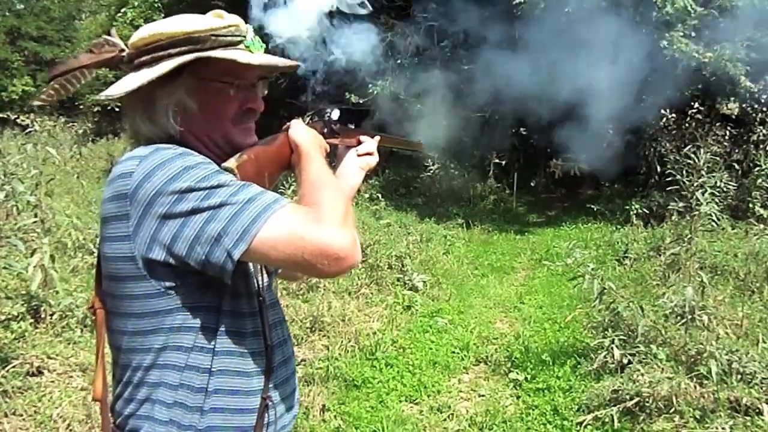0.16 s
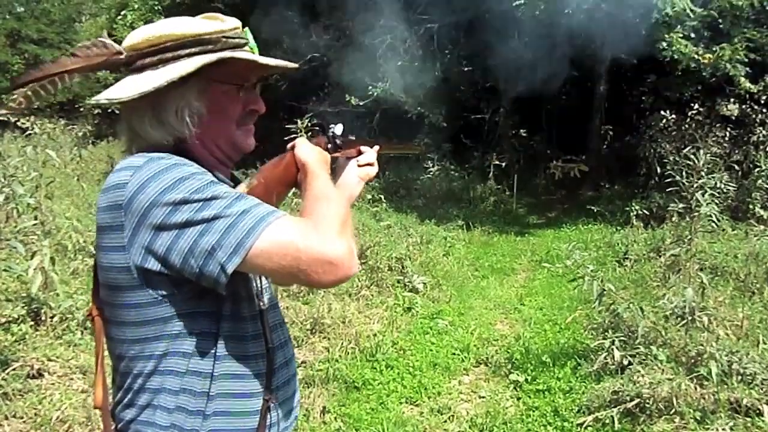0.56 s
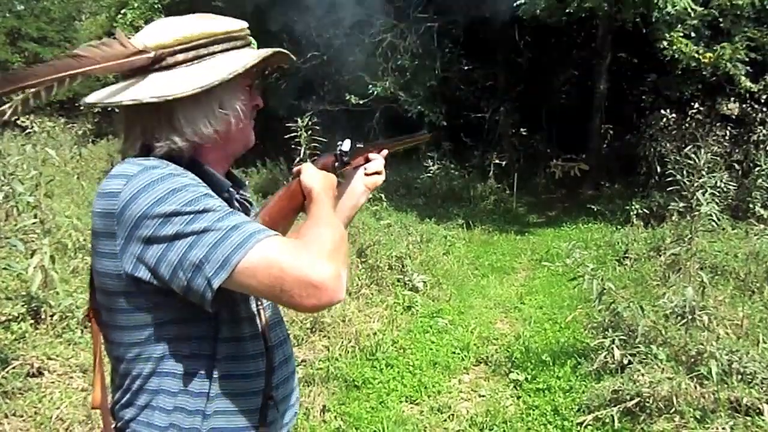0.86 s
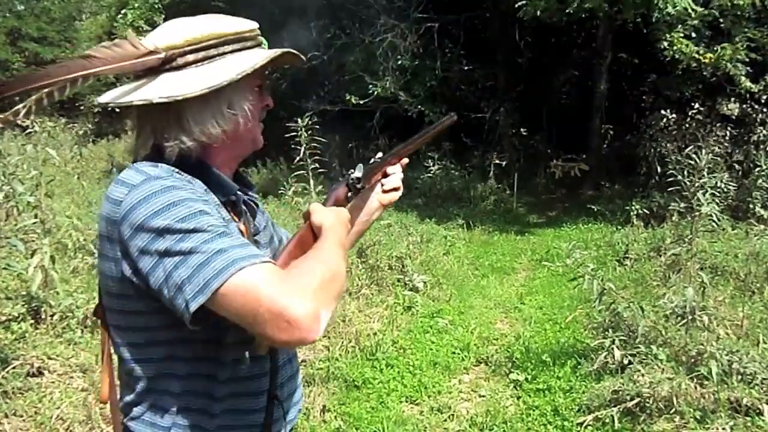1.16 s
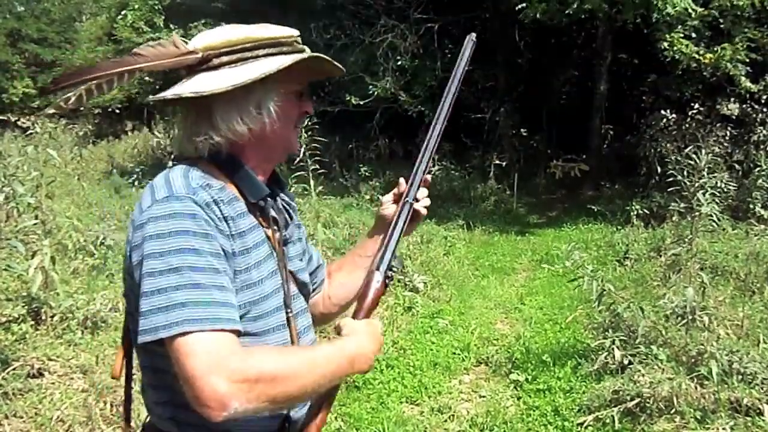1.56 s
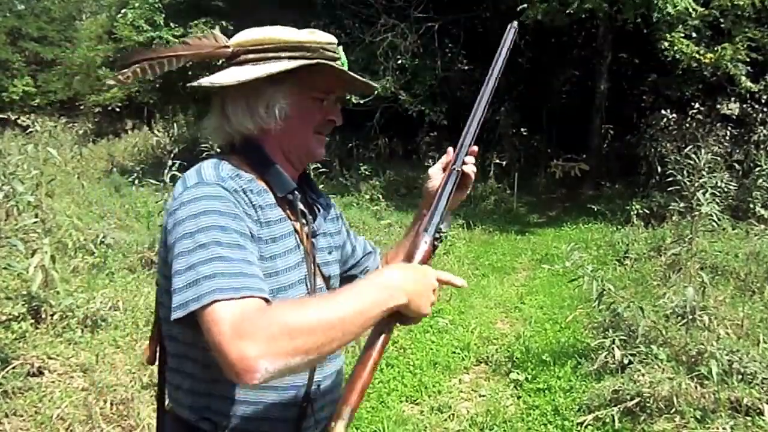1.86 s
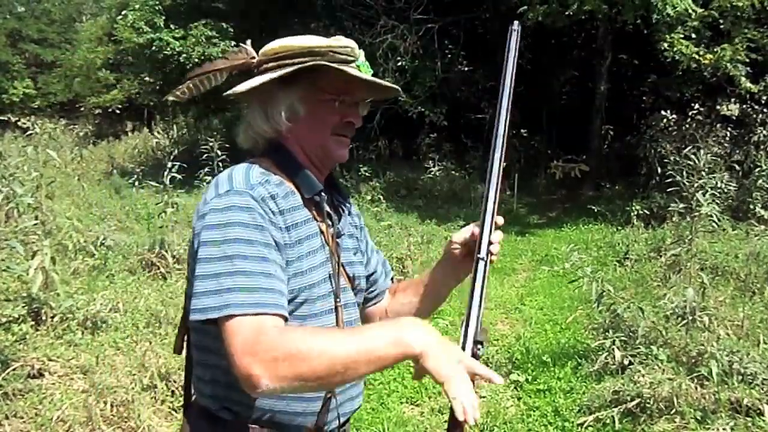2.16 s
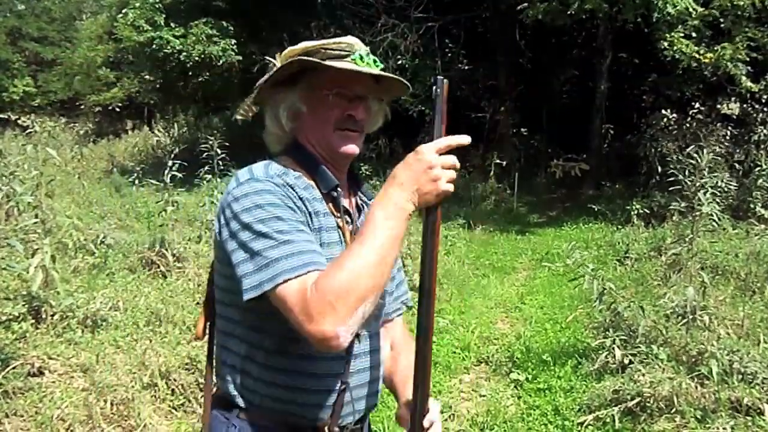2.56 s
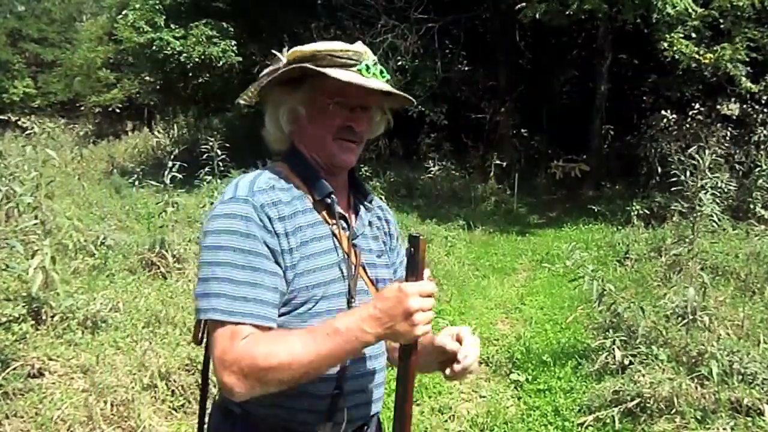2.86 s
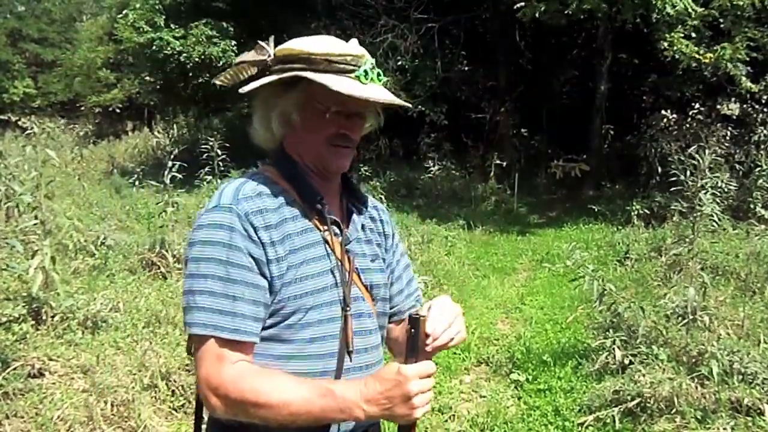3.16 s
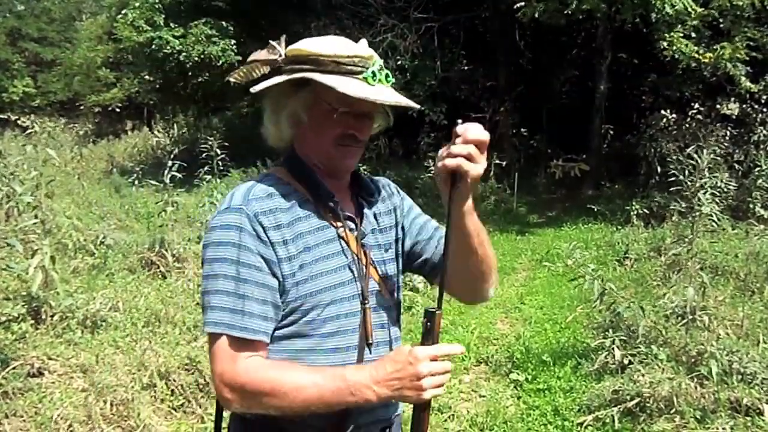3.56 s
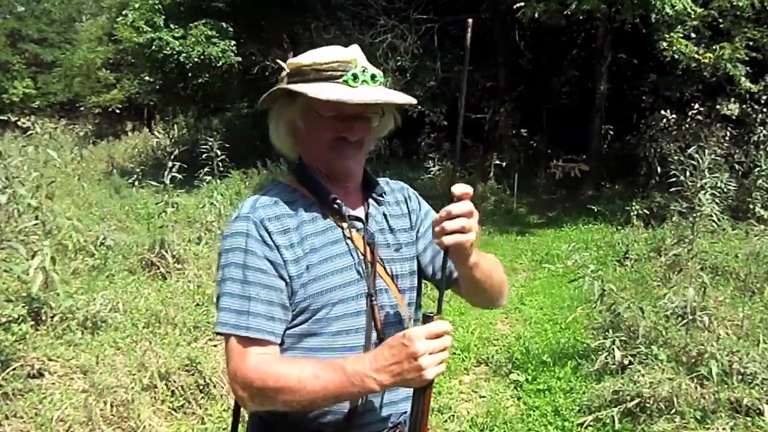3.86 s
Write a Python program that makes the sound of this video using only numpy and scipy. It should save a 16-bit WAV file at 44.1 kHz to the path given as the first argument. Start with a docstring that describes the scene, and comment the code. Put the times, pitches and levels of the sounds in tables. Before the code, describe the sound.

Outdoors in a clearing, the sound opens inside a rifle blast: a bright, hissing burst with a low thump and scattered tree echoes, dying over about a second. High insects chirr steadily. A hard click of wood and steel comes midway, then fainter ticks, a soft hollow slide through the hand, and rasping ramrod pulls. Mono microphone near the shooter; automatic gain raises the background late.

```python
"""Flintlock shot in a clearing

A rifle has just fired: its blast hisses back from trees and ground as dense random clicks and dies away.
Insects chirr as filtered clicks over noise for far rumble and field hiss. Handling the rifle and ramrod
gives ringing ticks and gritty rasps. An automatic gain stays low after the shot, then lifts the background."""
import sys
import numpy as np
from scipy import signal
from scipy.fft import rfft, irfft
from scipy.io import wavfile
from scipy.ndimage import uniform_filter1d

SR = 44100
rng = np.random.default_rng(int(sys.argv[2]) if len(sys.argv) > 2 else 0)


def master_out(mix):
    """Clip the mix to full scale and print it as 16-bit PCM to the path in sys.argv[1]."""
    frames = np.transpose(np.atleast_2d(mix))
    ceiling = np.clip(frames, -1, 1)
    pcm = np.round(ceiling * 32767).astype(np.int16)
    wavfile.write(sys.argv[1], SR, pcm)


N = 177326

# All levels are ahead of the automatic gain. Spectra and resonance mixes are relative.
# far low noise: (frequency [Hz], density [dB])
RUMBLE_SPECTRUM = [(10, -3.5), (24, 1), (34, -3.5), (45, -9), (62, 0.5), (90, -6), (122, 0.5), (160, -9.5),
                   (280, -12.5), (500, -18.5), (1300, -30), (3000, -52)]
# far low noise: (time [s], level [dB])
RUMBLE_LEVEL = [(0, -61), (1, -59), (2.6, -60.5), (3.2, -63), (4.02, -58.5)]
# rustle of the field: (frequency [Hz], density [dB])
HISS_SPECTRUM = [(300, -15), (1300, -2.5), (3000, -3), (4200, -3), (5600, -5), (9000, -6), (14000, 2.5)]
HISS_DB = -65.5

# insects: (time [s], low chorus level [dB], high buzzer level [dB])
INSECT_LEVELS = [(0, -57.5, -67), (.8, -56.5, -55.5), (1.3, -56, -60), (2.5, -57, -57.5), (3.1, -56.5, -60),
                 (3.6, -55.5, -55), (4.02, -54.5, -64)]
# chorus resonances: (centre [Hz], width per pass [Hz], gain [dB])
CHORUS_BANDS = [(7216, 900, 1.5), (7532, 820, 0), (7736, 1100, -6)]
# buzzer's wing resonances: (centre [Hz], width per pass [Hz], gain [dB])
WING_BANDS = [(12440, 3200, -10.5), (13000, 7800, -1)]
STROKE_RATE_HZ, STROKE_WANDER = 65.3, 0.0556  # wing strokes; wander is relative, rms
THROB_DEPTH, THROB_WANDER = 0.19, 0.15  # mean depth 0-1 and its rms wander

# pulls on the ramrod: (start [s], rise [s], start to letting go [s], level [dB])
ROD_PULLS = [(3.329, .004, 0.046, -55), (3.379, .015, 0.053, -55), (3.435, .03, 0.069, -55.5),
             (3.516, 0.056, 0.2, -57.5), (3.567, 0.027, 0.073, -61.5), (3.703, 0.0037, 0.013, -58),
             (3.847, 0.048, .058, -53.5), (3.929, 0.009, 0.034, -60.5), (3.961, 0.03, 0.054, -55)]
# rasp of the rod: (frequency [Hz], density [dB])
ROD_SPECTRUM = [(500, -8.5), (1200, -9.5), (2500, -5.5), (4000, -3.5), (6000, -1), (9000, -3),
                (14000, -3.5)]
LET_GO_S = 0.024
# barrel in the palm: (centre [Hz], width per pass [Hz], gain [dB])
HOLLOW_BANDS = [(1820, 560, 8), (2440, 5300, -1), (590, 1160, 1)]
SLIP_START_S, SLIP_RISE_S, SLIP_END_S, SLIP_FALL_S, SLIP_DB = 2.78, 0.056, 3.03, 1, -69

# lock, stock and ramrod: (time [s], peak [dB], brightest [Hz], spread [octaves], bounce [dB], rattle [dB])
TICK_EVENTS = [(1.255, -57, 3600, 0.25, -14, -4), (1.474, -26.5, 3200, 1, -8.5, -24),
               (2.273, -48.5, 1010, 1.2, -10, -40), (2.616, -60, 1300, .8, -13, -3.5),
               (2.65, -51.5, 1530, 1.6, -13, -6.5), (3.336, -42.5, 3200, 1.3, -5, -16),
               (3.3555, -37.5, 2600, 3, -8, -18), (3.397, -55, 1800, 1.5, -1, 1.5),
               (3.472, -37, 3000, .95, -16, -28), (3.704, -35, 3700, 1, -12, -18),
               (3.504, -56.5, 1110, 0.9, 2, -10), (3.573, -52, 2930, 1.8, -2, -14),
               (3.673, -70, 3080, 0.92, -6, -25), (3.881, -54.5, 900, 0.71, -14, -31),
               (3.938, -59, 3000, 1.4, -4, -15)]
# modes of wood and steel before detuning: (frequency [Hz], level [dB], t60 [s])
RIFLE_MODES = [(604, -44, 0.0088), (998, -8, 0.013), (1287, 1.5, 0.0054), (2100, -13, 0.0096),
               (2570, -2.5, 0.0044), (2796, 3.5, 0.0033), (3270, -5, 0.0035), (4200, -6, 0.0031),
               (6500, -3.5, 0.0031), (7760, 14, 0.0025), (10840, 7, 0.0043), (12500, -15, 0.0026)]
BOUNCE_S, CONTACT_S, RATTLE_T60_S = 0.004, 0.00076, 0.06
# one short soft ping: (time [s], fundamental peak [dB], frequency [Hz], length [s])
PING = (3.256, -55.5, 5620, .021)

# treble scattered by foliage: (frequency [Hz], density [dB])
LEAF_SPECTRUM = [(2650, -26.5), (4500, -3.5), (4990, -7), (5430, -3), (7200, -0.5), (11800, -4.5),
                 (13900, -4.5)]
# middle scattered by branches: (frequency [Hz], density [dB])
BRANCH_SPECTRUM = [(710, -33), (1200, -14), (1460, -2.5), (1940, -9.5), (2570, -1), (3450, -5),
                   (4500, -6.5), (5850, -28.5), (9900, -120)]
# lows scattered by trunks and ground: (frequency [Hz], density [dB])
GROUND_SPECTRUM = [(22, -4), (60, -0.5), (110, -4.5), (230, -11), (420, -4), (680, -7), (900, -1),
                   (1250, -9), (1700, -23)]
# rows treble, middle, low: (start [dB], near [dB], near t60 [s], far [dB], far rise [s], far t60 [s],
# roll [dB], roll t60 [s])
BAND_RETURNS = [(-15.5, -15, 0.25, -22.5, 0.0236, 0.24, -26, 0.73),
                (-30, -25.5, 0.2, -30, 0.0073, 0.36, -38, 1.11),
                (-31.5, -30, .1, -43, 0.0025, 0.64, -47, 1.65)]
NEAR_PEAK_S, NEAR_HOLD_S, FAR_S = 0.022, 0.032, 0.083  # near trees peak, hold until; far line at full
# colours that linger: (centre [Hz], width per pass [Hz], starting level [dB], t60 [s])
LINGERING_BANDS = [(1500, 300, -53, 1.5), (3700, 250, -48, .8)]
# suction and slow rebound of the air, low wobble: (frequency [Hz], level [dB], t60 [s], upward crossing [s])
AIR_PUSH = [(6.5, -23, .28, .013), (35, -30, .26, .018)]
# single returns from big trees: (time [s], peak [dB], centre [Hz], t60 before filtering [s])
TREE_ECHOES = [(.007, -23, 910, 0.0078), (0.0178, -14, 1500, 0.0056), (0.024, -13, 1590, 0.0076),
               (0.035, -26, 2250, 0.018), (0.042, -31.5, 2400, 0.034), (.0835, -18, 1500, 0.018),
               (.0905, -18.5, 2200, 0.0085), (0.1, -32, 1500, 0.015), (0.1145, -25.5, 1500, 0.04),
               (0.25, -35, 3720, 0.017), (0.304, -41, 11000, 0.02), (0.31, -36, 11100, 0.056)]
ECHO_WIDTH = 2.2  # per filter pass, multiples of the centre

LOUD_DB, GAIN_HOLD_S, GAIN_RECOVERY_S, GAIN_LIFT_DB = -30, 2.15, 0.44, 11.25
EDGE_HZ = 14000


def gain_of(db):
    """Decibels to amplitude gain."""
    return 10 ** (np.asarray(db) / 20)


def evened(x):
    """Scales to rms 1."""
    return x / np.sqrt(np.mean(x ** 2) + 1e-20)


def curves(rows):
    """Interpolates each table column after time to every sample."""
    time_s, *columns = np.transpose(rows)
    return [np.interp(np.arange(N) / SR, time_s, column) for column in columns]


def coloured(x, points):
    """Filters by a log-frequency spectrum, then scales to rms 1."""
    f, db = np.transpose(points)
    hz = np.fft.rfftfreq(N, 1 / SR)
    response_db = np.interp(np.log(hz + 1), np.log(f + 1), db)
    return evened(irfft(rfft(x) * gain_of(response_db), N))


def resonate(x, hz, width_hz, passes):
    """Repeats a resonance: shifts hz to zero, smooths with one pole, shifts back."""
    turn = np.exp(2j * np.pi * hz * np.arange(len(x)) / SR)
    pole = np.exp(-np.pi * abs(width_hz) / SR)
    for _ in range(passes):
        x = 2 * (turn * signal.lfilter([1 - pole], [1, -pole], x / turn)).real
    return x


def resonances(x, bands, passes):
    """Sums parallel resonances of one excitation."""
    return sum(gain_of(db) * resonate(x, hz, width_hz, passes) for hz, width_hz, db in bands)


def grains(per_s, spread_db):
    """Random clicks of either sign and uneven size."""
    size_db = spread_db * np.minimum(rng.exponential(1, N), 5)
    size = gain_of(size_db) * rng.choice([-1., 1.], N)
    return size * (rng.random(N) < per_s / SR)


def drift(seconds):
    """Slow random wander of rms 1: noise averaged twice."""
    size = max(round(seconds * SR), 2)
    return evened(uniform_filter1d(uniform_filter1d(rng.standard_normal(N), size), size))


def stroke(start_s, rise_s, end_s, fall_s):
    """Rises from start, holds until end, then falls."""
    t = np.arange(N) / SR
    return np.clip(np.minimum((t - start_s) / rise_s, 1 - (t - end_s) / fall_s), 0, 1)


def add(mix, time_s, sound):
    """Adds a sound in place at a time."""
    part = mix[round(time_s * SR):][:len(sound)]
    part += sound[:len(part)]


def air():
    """Far rumble that swells a little, and a thin patchy hiss: two coloured noises."""
    rumble_db = curves(RUMBLE_LEVEL)[0] + 0.92 * drift(0.14)
    hiss_db = HISS_DB + 0.8 * drift(0.04)
    rumble = gain_of(rumble_db) * coloured(rng.standard_normal(N), RUMBLE_SPECTRUM)
    return rumble + gain_of(hiss_db) * coloured(rng.standard_normal(N), HISS_SPECTRUM)


def insects():
    """A crowd of clickers blurs into a band; a buzzer throbs with its wing strokes."""
    chorus_db, buzzer_db = curves(INSECT_LEVELS)
    clicks = grains(per_s=9000, spread_db=1.0) * gain_of(1.0 * drift(0.16))
    chorus = resonances(clicks, CHORUS_BANDS, passes=3)

    strokes_hz = STROKE_RATE_HZ * (1 + STROKE_WANDER * drift(0.25))
    depth = np.clip(THROB_DEPTH + THROB_WANDER * drift(0.17), 0, 1)
    throb = 1 + depth * np.cos(2 * np.pi * np.cumsum(strokes_hz) / SR)
    teeth = grains(per_s=18000, spread_db=1.5) * throb * gain_of(1.5 * drift(0.05))
    buzz = resonances(teeth, WING_BANDS, passes=3)
    return gain_of(chorus_db) * evened(chorus) + gain_of(buzzer_db) * evened(buzz)


def barrel_slip():
    """The barrel slips down through the hand: friction noise in hollow resonances."""
    skin = rng.standard_normal(N) * gain_of(0.85 * drift(0.017))
    hollow = resonances(skin, HOLLOW_BANDS, passes=2)
    slip = gain_of(SLIP_DB) * stroke(SLIP_START_S, SLIP_RISE_S, SLIP_END_S, SLIP_FALL_S)
    return slip * evened(hollow)


def ramrod_pulls():
    """The rod rasps in gritty clumps; each pull rises, holds and lets go."""
    grit = grains(per_s=3300, spread_db=1.5) * gain_of(1.55 * drift(0.0063))
    pull = sum(gain_of(db) * stroke(start_s, rise_s, start_s + length_s, LET_GO_S)
               for start_s, rise_s, length_s, db in ROD_PULLS)
    return pull * coloured(grit, ROD_SPECTRUM)


def ping():
    """A soft tone and one inharmonic overtone under a smooth bell."""
    out = np.zeros(N)
    time_s, db, hz, length_s = PING
    t = np.arange(0, length_s, 1 / SR)
    tone = np.sin(2 * np.pi * hz * t) + 0.2 * np.sin(2 * np.pi * 1.69 * hz * t)
    add(out, time_s, gain_of(db) * np.hanning(len(t)) * tone)
    return out


def ticks():
    """Each blow rings the modes near its brightest pitch, bounces once and rattles briefly."""
    out, t = np.zeros(N), np.arange(2500) / SR
    mode_hz, mode_db, t60_s = np.transpose(RIFLE_MODES)[:, :, None]
    contact = 1 - np.exp(-t / CONTACT_S)
    for time_s, db, hz, octaves, bounce_db, rattle_db in TICK_EVENTS:
        detune = rng.uniform(0.96, 1.04, (len(RIFLE_MODES), 1))
        struck_db = mode_db - 6 * (np.log2(mode_hz / hz) / octaves) ** 2
        modes = gain_of(struck_db - 60 * t / t60_s) * np.sin(2 * np.pi * mode_hz * detune * t)
        ring = contact * modes.sum(axis=0)
        tick = ring / abs(ring).max()
        add(out, time_s, gain_of(db) * tick)
        add(out, time_s + BOUNCE_S, gain_of(db + bounce_db) * tick)

        rattle = evened(resonate(rng.standard_normal(len(t)), hz, 1.3 * hz, passes=1))
        add(out, time_s, gain_of(db + rattle_db - 60 * t / RATTLE_T60_S) * rattle)
    return out


def return_level(start_db, near_db, near_t60, far_db, far_rise, far_t60, roll_db, roll_t60):
    """One band: near trees swell, hold and die, the far line answers, the wood rolls on."""
    t = np.arange(N) / SR
    swell_db = np.interp(t, [0, NEAR_PEAK_S], [start_db, near_db])
    near = gain_of(swell_db - 60 * np.maximum(t - NEAR_HOLD_S, 0) / near_t60)
    far_rising = np.clip(1 + (t - FAR_S) / far_rise, 0, 1)
    far = far_rising * gain_of(far_db - 60 * np.maximum(t - FAR_S, 0) / far_t60)
    roll = np.minimum(t / FAR_S, 1) ** 2 * gain_of(roll_db - 60 * t / roll_t60)
    return np.sqrt(near ** 2 + far ** 2 + roll ** 2)  # powers add


def scattered_blast():
    """Countless leaves, branches and trunks each return the blast as a tiny click."""
    treble, middle, low = (return_level(*band) for band in BAND_RETURNS)
    out = treble * coloured(grains(per_s=16000, spread_db=0.0), LEAF_SPECTRUM)
    out += middle * coloured(grains(per_s=5000, spread_db=-2.0), BRANCH_SPECTRUM)
    out += low * coloured(grains(per_s=2000, spread_db=1.5), GROUND_SPECTRUM)
    return out


def lingering_colours():
    """Narrow bands of noise linger in the echo and decay exponentially."""
    out, t = np.zeros(N), np.arange(N) / SR
    for hz, width_hz, db, t60_s in LINGERING_BANDS:
        band = evened(resonate(rng.standard_normal(N), hz, width_hz, passes=2))
        out += gain_of(db - 60 * t / t60_s) * band
    return out


def air_push():
    """Suction and slow rebound of the air, with a low wobble: decaying sines."""
    t = np.arange(N) / SR
    return sum(gain_of(db - 60 * t / t60_s) * np.sin(2 * np.pi * hz * (t - turn_s))
               for hz, db, t60_s, turn_s in AIR_PUSH)


def tree_echoes():
    """Big trees stand out as single broad bursts of decaying, filtered noise."""
    out, t = np.zeros(N), np.arange(3000) / SR
    for time_s, db, hz, t60_s in TREE_ECHOES:
        decaying = rng.standard_normal(len(t)) * gain_of(-60 * t / t60_s)
        burst = resonate(decaying, hz, ECHO_WIDTH * hz, passes=2)
        add(out, time_s, gain_of(db) * burst / abs(burst).max())
    return out


def shot():
    """The blast as clearing and air return it."""
    return scattered_blast() + lingering_colours() + air_push() + tree_echoes()


def scene():
    """All sources at the microphone, one channel."""
    handling = barrel_slip() + ramrod_pulls() + ping() + ticks()
    return (air() + insects() + handling + shot())[None]


def record(dry):
    """Loud sound resets the gain; it holds low, then creeps up. A low-pass limits the band."""
    power_db = 10 * np.log10(abs(uniform_filter1d(dry[0] ** 2, 2000)) + 1e-12)
    t = np.arange(N) / SR
    last_loud_s = np.maximum.accumulate(np.where(power_db > LOUD_DB, t, 0))
    recovering_s = np.maximum(t - last_loud_s - GAIN_HOLD_S, 0)
    recovered = 1 - np.exp(-(recovering_s / GAIN_RECOVERY_S) ** 1.42)
    lifted = dry * gain_of(GAIN_LIFT_DB * recovered)
    low_pass = signal.firwin(1023, EDGE_HZ, window=("kaiser", 9), fs=SR)
    return signal.oaconvolve(lifted, low_pass[None], "same")


dry = scene()
out = record(dry)
master_out(out)
```